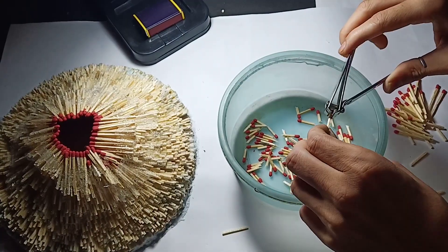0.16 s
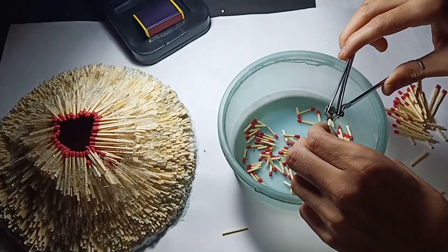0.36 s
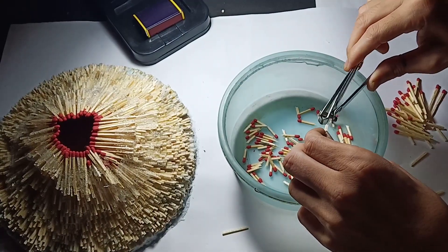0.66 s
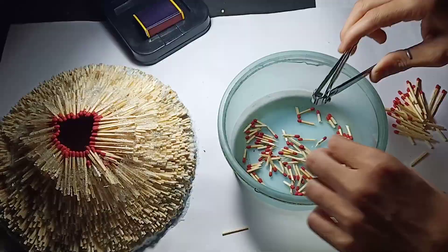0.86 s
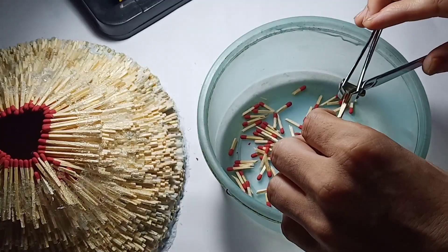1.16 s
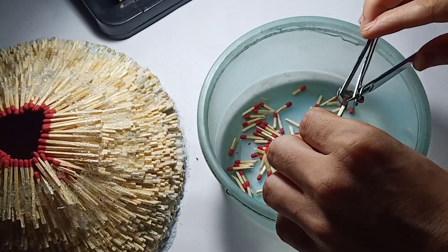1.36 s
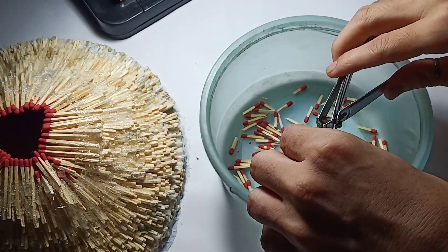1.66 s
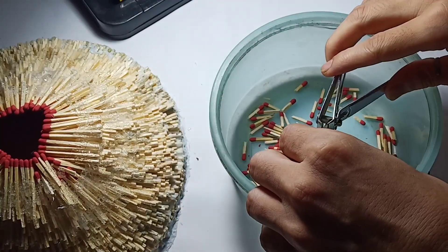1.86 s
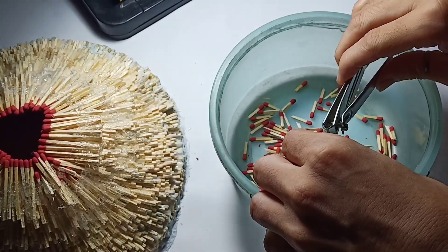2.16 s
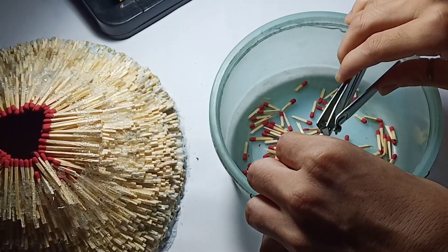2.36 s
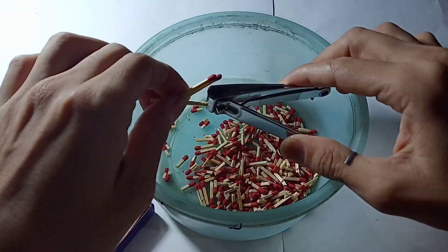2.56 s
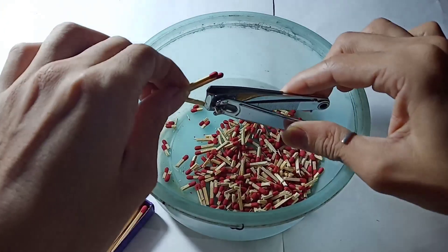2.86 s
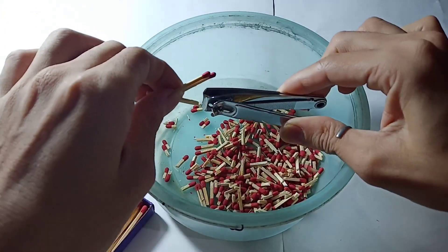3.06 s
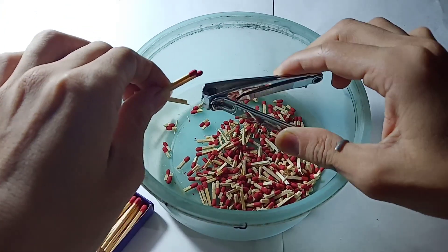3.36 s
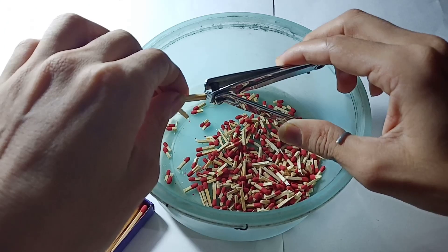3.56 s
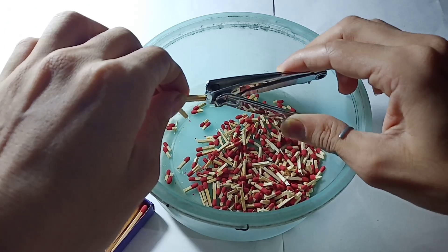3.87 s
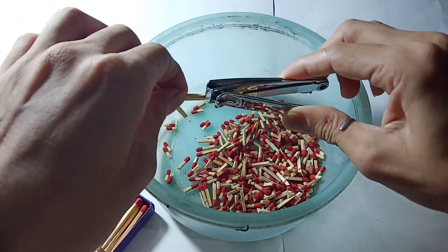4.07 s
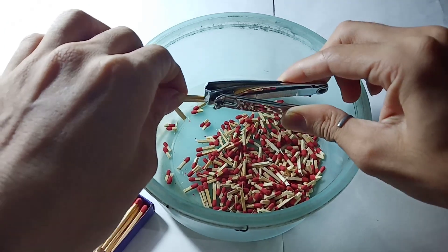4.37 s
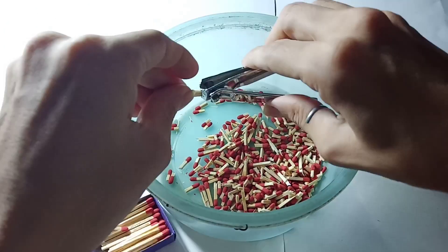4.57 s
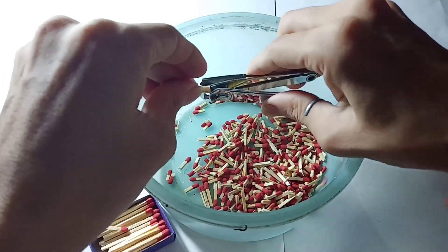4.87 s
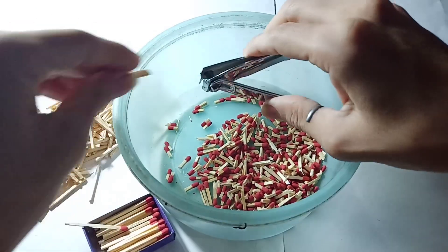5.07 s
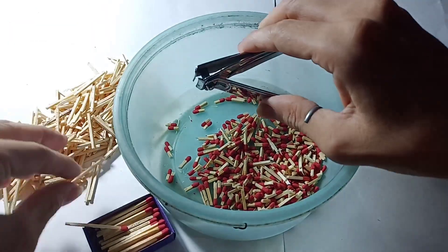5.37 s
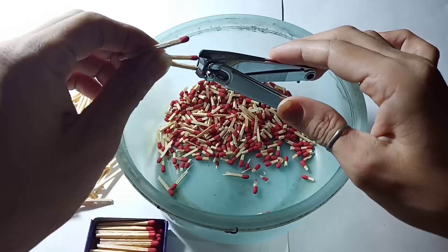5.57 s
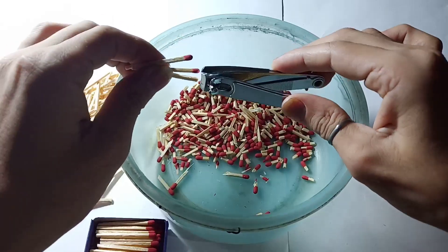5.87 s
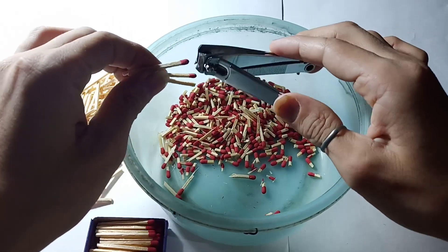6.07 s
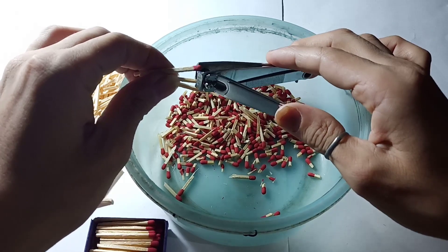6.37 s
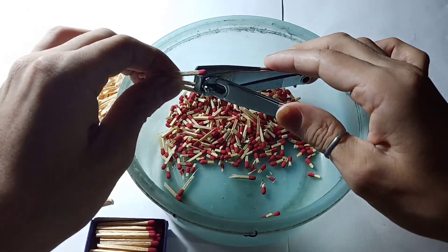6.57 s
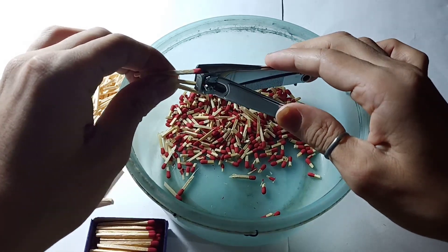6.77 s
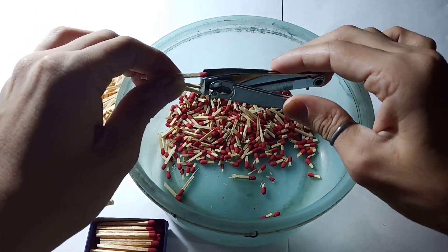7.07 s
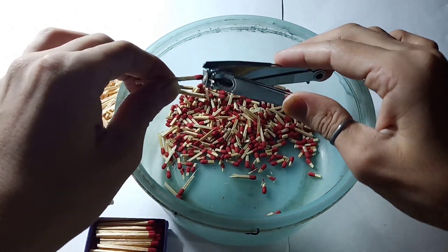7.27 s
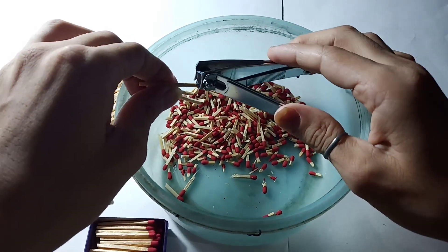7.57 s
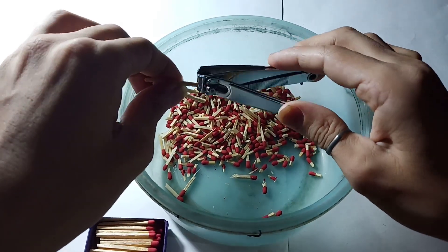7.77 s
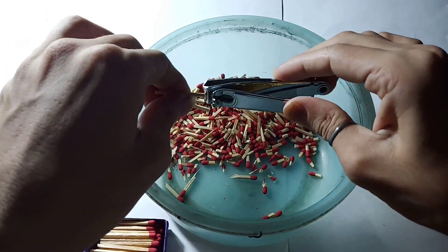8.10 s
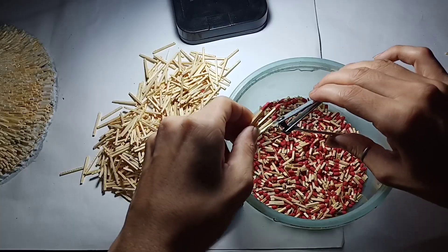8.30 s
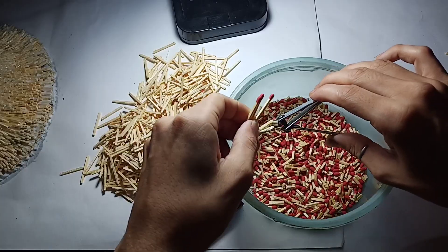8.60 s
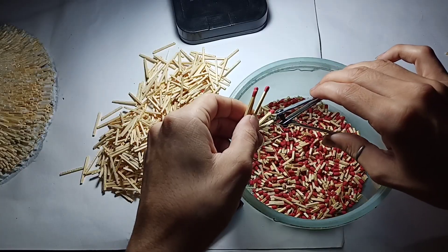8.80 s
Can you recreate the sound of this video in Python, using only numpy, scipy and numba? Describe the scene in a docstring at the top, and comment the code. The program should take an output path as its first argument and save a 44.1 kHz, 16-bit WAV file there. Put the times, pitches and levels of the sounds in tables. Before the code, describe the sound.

Indoors at a table, a steel nail clipper cuts wooden matchsticks over a plastic bowl. A low hum and airy rush come first, then crisp snaps followed by small bowl ticks. A quieter stretch has soft bumps; later ones bring more hiss and clusters of cuts. Near the end the room drops almost silent, with a faint double knock and a last click. Close mono phone microphone.

```python
"""A low hum and the rush of the room come first, then sharp clicks, with a mono phone microphone close by.
A steel nail clipper snips matchsticks over a plastic bowl, in seven stretches that fade in and out.
A click is a burst of tiny cracks that rings jaws, stick and bowl, then a bright room tail of noise.
Hum, boom, rush and hiss are wavering tone and noise; bumps through the table are decaying sines.
Thin tones, rattling heads and a double knock come between; gain control ducks all around loud sounds."""
import sys
import numpy as np
from scipy import signal
from scipy.io import wavfile
from scipy.ndimage import uniform_filter1d, minimum_filter1d
from numba import njit

SR = 44100
rng = np.random.default_rng(int(sys.argv[2]) if len(sys.argv) > 2 else 0)


def pcm_store(signal):
    """Save signal as 16-bit PCM."""
    levels = np.round(np.clip(np.atleast_2d(signal), -1, 1) * 32767)
    wavfile.write(sys.argv[1], SR, levels.astype(np.int16).T)


N = 394254


def undb(db):
    """Decibels to amplitude."""
    return 10 ** (np.asarray(db) / 20)


def unit(x):
    """Scale to rms 1."""
    return x / np.sqrt(np.mean(x ** 2))


def even(y):
    """Scale so that the loudest millisecond has peaks near 1."""
    return y / (2.09 * np.sqrt(uniform_filter1d(y ** 2, size=44).max()))


def decay(t, t60):
    """Exponential fall of 60 dB in t60 seconds."""
    return np.exp(-np.log(1000) * t / t60)


def add(out, s, x):
    """Mix x into out from time s."""
    i = int(s * SR)
    out[i:i + len(x)] += x[:N - i]


def curves(table):
    """Straight lines through the rows of a table, one curve for each column after the time."""
    t = np.arange(N) / SR
    s, *columns = np.transpose(table)
    return [np.interp(t, s, c) for c in columns]


def walk(rate):
    """Random levels held 1 / rate s and slewed twice; spread near 1."""
    k = int(SR / rate)
    steps = np.repeat(rng.standard_normal(N // k + 1), k)
    return 1.37 * uniform_filter1d(uniform_filter1d(steps, k), k)[:N]


def band(hz, width, size=N):
    """Noise in a fixed band, rms 1."""
    edges = hz - width / 2, hz + width / 2
    sos = signal.butter(2, edges, "band", fs=SR, output="sos")
    return unit(signal.sosfilt(sos, rng.standard_normal(size)))


def above(x, hz):
    """Steep high-pass."""
    return signal.sosfilt(signal.butter(4, hz, "high", fs=SR, output="sos"), x)


def coloured(points, flicker_db, share, count):
    """Neighbouring noise bands that follow a spectrum, each flickering alone."""
    hz, db = np.transpose(points)
    centres = np.geomspace(hz[0], hz[-1], count)
    # a band is as wide as a share of its centre, so its power grows with frequency
    gains = np.interp(np.log(centres), np.log(hz), db) + 10 * np.log10(centres)
    return unit(sum(undb(g + flicker_db * walk(22)) * band(f, share * f) for f, g in zip(centres, gains)))


@njit
def svf(x, hz, width):
    """State-variable band-pass whose centre and width move every sample."""
    y, b, l = np.empty(len(x)), 0., 0.
    for i in range(len(x)):
        g, k = np.tan(np.pi * hz[i] / SR), width[i] / hz[i]
        v = (b + g * (x[i] - l)) / (1 + g * (g + k))
        b, l, y[i] = 2 * v - b, l + 2 * g * v, k * v
    return y


def drifting(hz, width):
    """Noise through a moving resonance applied twice, rms near 1 at any width."""
    noise = rng.standard_normal(N) / np.sqrt(width)
    return unit(svf(svf(noise, hz, width), hz, width))


# the seven stretches: start t/s, fade-in t/s, end t/s, fade-out t/s, steady share of the hum [0-1],
# boom width f/Hz, hiss level/dB and rustle level/dB over the treble level
STRETCHES = [(-.1, .01, 0.98, 0.093, 0.62, 303, -3, -25.5), (1.007, 0.037, 2.521, 0.15, 0.036, 115, 2, -22),
             (2.494, 0.05, 3.554, 0.14, 0.84, 342, -5.5, -25.5),
             (3.493, 0.00081, 4.49, 0.096, 0.15, 220, -4, -22.5),
             (4.537, 0.0012, 5.565, 0.1, 0.15, 217, -4.5, -22.5),
             (5.603, 0.042, 8.272, 0.057, 0.4, 307, -6, -27),
             (8.305, 0.06, 9.19, 0.14, 0.08, 250, -10, -16)]
# colour of each stretch: rumble level/dB under the hum, then noise near 4.6 kHz, near 9 kHz
# and at 2-4 kHz, each level/dB over the treble level
SHADES = [(-5, -15.5, -26.5, 0.3), (-5.5, -3.5, -30, -1), (-20.5, -16.5, -23.5, .3), (-13, -26.5, -22.5, 0),
          (-4.5, -19, -17.5, -0.1), (-8, -24, -31.5, 0.1), (-8, -17, -22, -.3)]


def by_stretch():
    """Number of the stretch that each sample belongs to."""
    return np.searchsorted(np.transpose(STRETCHES)[0], np.arange(N) / SR) - 1


# pitch of the hum: t/s, f/Hz
HUM = [(0, 132.1), (.19, 116), (.32, 120), (.9, 119.7), (1.05, 89.04), (1.25, 104), (1.49, 82.1),
       (1.8, 105), (1.92, 83.8), (2.1, 81.84), (2.38, 114.9), (2.55, 104), (3.45, 104), (3.57, 122.2),
       (4.03, 106), (4.38, 122), (5.07, 122), (5.2, 98.07), (5.45, 105.2), (5.67, 130), (5.76, 130.3),
       (5.9, 92), (6.36, 89.77), (6.45, 97.8), (6.9, 83.6), (7.28, 78.63), (7.39, 130.7), (8.0, 119.9),
       (8.1, 102.6), (8.35, 122), (8.9, 125)]
# the low end, in groups of rows: t/s, hum level/dB, boom level/dB, boom f/Hz
LOWS = [
    [(0.0, -28.5, -35, 248), (0.14, -34.5, -42, 271), (0.22, -41, -42.5, 387), (0.3, -27.5, -40, 225.8),
     (0.324, -33.5, -40, 261.5), (0.506, -36, -57, 219.6), (0.534, -31, -61, 228), (0.57, -37.5, -42, 291),
     (0.664, -36.5, -56.5, 220.7), (0.756, -32, -58, 220.4), (0.86, -36.5, -45.5, 224)],
    [(1.05, -54, -61, 219.2), (1.078, -47.5, -72.5, 218), (1.164, -35, -48, 225.3),
     (1.198, -55.5, -51, 244), (1.226, -35, -52, 221.7), (1.386, -69, -60, 245), (1.42, -52, -45, 252),
     (1.528, -45, -56, 249.6), (1.59, -63, -53, 229.8), (1.634, -45, -50.5, 256), (1.7, -64, -52, 228.3)],
    [(1.72, -42, -52, 237.5), (1.748, -57, -52, 242), (1.778, -33.5, -55, 225), (1.832, -49, -55, 248.7),
     (1.91, -46, -55, 247.5), (1.944, -59, -58, 245), (2.01, -50, -54, 362.5), (2.04, -60, -53, 318),
     (2.092, -33.5, -43, 336), (2.178, -57, -49.5, 336), (2.38, -59, -54, 371)],
    [(2.55, -62, -38.5, 436), (2.764, -32, -42.5, 357.4), (2.818, -31, -38, 401), (2.914, -36.5, -56, 321),
     (3.028, -33, -42, 332), (3.08, -31, -51, 251), (3.13, -38, -41, 310), (3.178, -33.5, -41.5, 275.4),
     (3.212, -42, -53, 416), (3.272, -38.5, -36, 408), (3.39, -40.5, -41.5, 382)],
    [(3.5, -57.5, -42, 420), (3.53, -54, -50, 447), (3.65, -57, -42.5, 389), (3.678, -70, -41, 423),
     (3.772, -58, -55, 437), (3.794, -64, -49, 407), (4.154, -55, -39.5, 419), (4.186, -58, -49.5, 385),
     (4.252, -86, -44, 432), (4.272, -65, -48, 451.5), (4.38, -61, -49.5, 400)],
    [(4.55, -58, -40.5, 453), (4.606, -76, -57, 419), (4.646, -65, -45.5, 422), (4.764, -75, -41, 334),
     (4.82, -74, -50, 393), (4.996, -64, -54.5, 460), (5.136, -69, -56, 445), (5.158, -64, -61, 383.5),
     (5.196, -69, -43, 400), (5.442, -73.5, -38.5, 427), (5.45, -79, -46, 432)],
    [(5.67, -56.5, -51, 390), (5.696, -41.5, -38.5, 376), (5.746, -35.5, -51, 251),
     (5.806, -38, -47, 273.5), (5.838, -58, -52, 385), (5.888, -40.5, -40, 449), (5.982, -39.5, -55, 269),
     (6.056, -35, -51.5, 346.5), (6.352, -48.5, -45.5, 380), (6.426, -39.5, -62, 245), (6.5, -58, -48, 325)],
    [(6.53, -37, -45, 410), (6.56, -52, -40.5, 463), (6.814, -46.5, -50.5, 352), (6.846, -41, -63, 239),
     (6.906, -52, -50.5, 361), (7.052, -42, -40.5, 386.5), (7.084, -49, -56, 322), (7.16, -37, -43, 385),
     (7.212, -47, -65, 342), (7.246, -39, -37.5, 448), (7.3, -52, -46, 403.5)],
    [(7.33, -60, -41, 382), (7.4, -58, -46, 398), (7.45, -37, -41.5, 261), (7.49, -69, -51, 365),
     (7.538, -40, -40, 357), (7.584, -60, -44.5, 392.5), (7.834, -44, -39.5, 252), (7.864, -56, -54, 280),
     (7.942, -49, -36, 412.6), (8.006, -45, -44, 253), (8.1, -41, -38.5, 410)],
    [(8.35, -51.5, -67.5, 224), (8.382, -52.5, -72, 217), (8.434, -81, -74, 275), (8.48, -53.5, -77, 219.4),
     (8.552, -70, -64, 273), (8.626, -80, -75, 296.5), (8.722, -63.5, -72, 295), (8.786, -83.5, -58, 427.8),
     (8.832, -63, -65, 319), (8.858, -86, -80, 295), (8.9, -70, -74, 298)],
]


def low_end():
    """The hum is part steady tone, part lumpy rumble at its pitch; the boom is a drifting noise resonance."""
    hum_db, boom_db, boom_hz = curves(np.vstack(LOWS))
    hum_hz, = curves(HUM)
    stretch = by_stretch()
    steady, width = np.array(STRETCHES)[stretch, 4:6].T.copy()
    rumble_db = np.array(SHADES)[stretch, 0]
    phase = 2 * np.pi * np.cumsum(hum_hz * (1 + 0.0203 * walk(18))) / SR
    tone = np.sqrt(2) * np.sin(phase) * undb(1.4 * walk(23))
    lumps = undb(2.8 * walk(25)) * drifting(hum_hz, np.full(N, 45.))
    rumble = lumps + undb(rumble_db) * band(60, 45) + undb(-8.5) * band(170, 60)
    hum = np.sqrt(steady) * tone + np.sqrt(1 - steady) * rumble
    boom = undb(boom_db + 2.2 * walk(20)) * drifting(boom_hz, width)
    return undb(hum_db) * hum + boom


# the room noise swells and sinks: t/s, rush level/dB, treble level/dB, level/dB near 520 Hz before a trim
SWELL = [(0.0, -44.5, -44.5, -45), (0.08, -44, -45.0, -50), (0.15, -43, -45.5, -46.5),
         (0.23, -39.5, -43.5, -41), (0.31, -43.5, -47.5, -46), (0.39, -43.5, -48, -45.5),
         (0.46, -46, -49.5, -49), (0.54, -43.5, -49.5, -47), (0.62, -44.5, -48, -51),
         (0.7, -50.5, -52, -59), (0.77, -45, -48.5, -51.5), (0.85, -53, -56.5, -60),
         (1.06, -64.5, -64.5, -80), (1.14, -63, -64.5, -74), (1.21, -57, -62, -76), (1.28, -56.5, -68, -73),
         (1.36, -59.5, -70, -74), (1.43, -56, -62.5, -74), (1.5, -51.5, -61.5, -71), (1.58, -49, -63, -70),
         (1.65, -49.5, -60, -70), (1.72, -50.0, -57.5, -60), (1.8, -50.5, -57, -72),
         (1.87, -51, -57.5, -76), (1.94, -52, -59.5, -72), (2.01, -53.5, -60, -61.0),
         (2.09, -45.5, -54.5, -52.5), (2.16, -52, -56, -54.5), (2.23, -58.5, -59, -57),
         (2.31, -56, -58, -62), (2.38, -47, -48.5, -59), (2.56, -39.0, -45, -47.5),
         (2.63, -41.5, -46.0, -50), (2.71, -42, -46, -43.0), (2.79, -37.5, -43, -43.0),
         (2.86, -44, -44.5, -47), (2.94, -42.5, -47.5, -48), (3.02, -36, -43.5, -46.0),
         (3.09, -43, -45, -50), (3.17, -42.5, -49.5, -49.5), (3.25, -39, -43.5, -47), (3.32, -39, -45, -44),
         (3.4, -47, -49, -50), (3.51, -40.5, -48.5, -51), (3.58, -41.5, -49.5, -49.0),
         (3.66, -42, -45.5, -53), (3.73, -43.0, -48.5, -44), (3.8, -43, -49, -50),
         (3.87, -42.5, -45.5, -47.5), (3.95, -36, -44.5, -49.5), (4.02, -39, -44.5, -39),
         (4.09, -38.5, -47.0, -41.5), (4.17, -43, -49.5, -48), (4.24, -41, -47.5, -47),
         (4.31, -43.0, -48.5, -44), (4.38, -44.5, -49.5, -56), (4.55, -43.5, -48.5, -53),
         (4.63, -43, -48.5, -56), (4.7, -40.5, -48, -50.5), (4.78, -40, -44.5, -51.5),
         (4.85, -46, -46.5, -54.5), (4.92, -47.5, -49.5, -54), (5.0, -44.5, -47.5, -52.5),
         (5.07, -44, -48.5, -51.0), (5.15, -41.5, -48.5, -52), (5.22, -40.5, -47.5, -49),
         (5.29, -41, -46.5, -43), (5.37, -41, -45.5, -49), (5.44, -41, -48.5, -42),
         (5.67, -48.5, -50.5, -57), (5.74, -45, -46.5, -52), (5.81, -45, -50, -48.5),
         (5.89, -39.5, -46.5, -46.5), (5.96, -42.5, -46, -45), (6.04, -44.5, -47.5, -45),
         (6.11, -42.5, -47, -44), (6.19, -43.5, -46.5, -52), (6.26, -40, -45, -43), (6.33, -44.5, -47, -54),
         (6.41, -43.5, -46.5, -50.5), (6.48, -40.5, -46.5, -54), (6.56, -41.0, -45.5, -51),
         (6.63, -38.5, -44.5, -44.5), (6.71, -44.5, -46.5, -53), (6.78, -47, -47.0, -51),
         (6.86, -47, -46.5, -60), (6.93, -40, -48, -47), (7.0, -41, -47, -50), (7.08, -44.5, -48, -52),
         (7.15, -43.5, -45, -50), (7.23, -48.5, -48.5, -55), (7.3, -41, -45.5, -44),
         (7.38, -42.5, -45.5, -51), (7.45, -44, -44.5, -49.0), (7.53, -41.5, -47.5, -47),
         (7.6, -45.5, -49.0, -53), (7.67, -42.0, -49.0, -48), (7.75, -42.5, -47.5, -46.0),
         (7.82, -44, -47.5, -54), (7.9, -47, -50, -51), (7.97, -41, -48.5, -43),
         (8.05, -40.5, -46.5, -47.5), (8.12, -41.5, -46.5, -46), (8.2, -54.5, -54, -64),
         (8.37, -73, -81.5, -75), (8.52, -73.5, -82, -79.5), (8.67, -75.5, -84, -78), (8.9, -77, -86, -85)]
# spectrum of the rush: f/Hz, relative level/dB per Hz
RUSH = [(600, -7.5), (700, -3.5), (1000, -7), (1400, -6.5), (2000, -12.5)]
# spectrum of the noise at 2-5 kHz: f/Hz, relative level/dB per Hz
SIZZLE = [(2100, 0.5), (3000, -1), (4100, -4), (5000, -12)]
# spectrum of the hiss: f/Hz, relative level/dB per Hz
HISS = [(5300, -10), (6000, -0.5), (6600, -0.5), (7300, -6), (8300, -14), (9500, -24)]
# spectrum of the faint bright rustle: f/Hz, relative level/dB per Hz
RUSTLE = [(9500, 0), (12000, -5.5), (14500, -1)]
SHIMMER_HISS_DB = -4  # hiss share of the afterglow of the clicks
RUSTLE_SWING = 1  # extra dB of rustle for each dB of swell


def room_noise():
    """Rush, hiss and rustle are flickering noise bands; the treble layers share one level."""
    rush_db, treble_db, low_db = curves(np.vstack(SWELL))
    stretch = by_stretch()
    hiss_db, rustle_db = np.array(STRETCHES)[stretch, 6:].T
    gap_db, air_db, sizzle_db = np.array(SHADES)[stretch, 1:].T
    mean_db = np.bincount(stretch, treble_db) / np.bincount(stretch)
    swell_db = treble_db - mean_db[stretch]
    glow = shimmer()
    rush = undb(rush_db) * coloured(RUSH, flicker_db=2.5, share=0.089, count=18)
    low = undb(low_db - 0.5 + 0.89 * walk(25)) * band(520, 170)
    sizzle = undb(treble_db + sizzle_db) * coloured(SIZZLE, flicker_db=2.0, share=.12, count=8)
    gap = undb(treble_db + gap_db + 2.2 * walk(23)) * band(4600, 1400)
    air = undb(treble_db + air_db) * band(9200, 2200)
    hiss_level = np.hypot(undb(treble_db + hiss_db), undb(SHIMMER_HISS_DB) * glow)
    hiss = hiss_level * coloured(HISS, flicker_db=1.0, share=0.11, count=8)
    rustle_level = np.hypot(undb(treble_db + rustle_db + RUSTLE_SWING * swell_db), glow)
    rustle = rustle_level * undb(2.1 * walk(120)) * coloured(RUSTLE, flicker_db=4.5, share=0.11, count=7)
    return rush + low + sizzle + gap + air + hiss + rustle


def background():
    """Low end and room noise swell and sink together in a quick shared flutter."""
    return undb(1.1 * walk(25)) * (low_end() + room_noise())


def microphone_hiss():
    """Even hiss of the microphone: broad noise at a constant level."""
    return undb(-78) * band(9000, 13000)


def ring(modes, crack, detune):
    """A crack excites decaying modes with fresh strengths, pitches and signs."""
    t = np.arange(int(.12 * SR)) / SR
    body = np.zeros(len(t))
    for hz, db, t60 in modes:
        strength, pitch, sign = rng.standard_normal(3)
        wave = np.sin(2 * np.pi * hz * (1 + detune * pitch) * t)
        body += undb(db + 2.0 * strength) * np.sign(sign) * wave * decay(t, t60)
    return even(signal.fftconvolve(body, crack))


# clicks, before gain control: t/s, jaws peak level/dB, bowl minus jaws level/dB, stick minus jaws level/dB,
# bowl pitch f/Hz, crack length t/ms, room tail level/dB relative to the jaws
CLICKS = [(0.6386, -22.5, -11, -20, 2040, 1.6, -14), (0.6567, -1.5, -21, -14, 3360, 2.4, -21),
          (0.692, -30, 3, 6, 3600, 2.2, -24), (0.6948, -12.5, -2, 2, 3980, 2, -23),
          (0.7125, -40, 13, 0, 4050, 2.5, -20), (0.731, -21, 1.5, 10, 2540, 2.6, -23),
          (0.762, -14, -20, -6, 3950, 1.7, -31), (0.827, -27, -6.5, 0.5, 3800, 3, -23),
          (0.8589, -45.5, -5, 3.5, 3700, 1.9, -33), (1.227, -52, -12, 4, 4500, 1.5, -28),
          (1.778, -39.5, -6, 1, 3950, 2.2, -22), (2.0532, -46, -14, -2, 2040, 1.8, -32),
          (2.073, -27, -15, -10, 2060, 1.6, -22), (2.092, -33, -9, -8, 3860, 2, -24),
          (2.102, -6, -19, -11, 3680, 2.1, -27), (2.132, -22.5, -16, -2, 4890, 2.6, -46),
          (2.168, -23.5, -27, -8, 3820, 1.5, -27), (2.276, -26, 0, 3, 3800, 1.4, -28),
          (2.2837, -23, -9, 3, 3760, 1.7, -22), (2.289, -34.5, 5, 6, 3800, 1.8, -25),
          (2.371, -34.5, 5.5, 6, 3000, 2, -37), (2.408, -35.5, 8, 10, 3800, 1.8, -30),
          (2.898, -33, -9, -0.5, 2140, 1.8, -13), (2.9637, -46.5, 17.5, 15, 3080, 2.1, -18),
          (3.059, 6, -16.5, -17, 4370, 2.8, -28), (3.0855, -17.5, 8.5, 6, 4200, 1.9, -25),
          (3.1482, -14.5, -9.5, -3, 2600, 1.2, -31), (3.158, -34, -10, 2, 3500, 1.5, -30),
          (3.166, -41, 2, 3, 3500, 1.8, -33), (3.3364, -38, 13, 2, 3800, 1.2, -15.5),
          (3.5498, -27, -1, -2, 3500, 3, -18), (3.814, -26.5, -9, -5, 2620, 1.6, -21),
          (3.961, -27, -6, -6, 2400, 1.9, -17), (4, -28, -13, -32, 2410, 1.8, -16),
          (4.1779, -45, -2, -3, 2690, 1.8, -30), (4.659, -27, -8, -6, 2710, 1.9, -27),
          (4.6734, -29, -14, -12.5, 3200, 1.8, -18.5), (4.7042, -34, -15, -11, 2310, 1.6, -16),
          (4.7855, 10.5, -20, -10.5, 4420, 1.3, -28), (4.8044, -26.5, -11, -5, 3820, 1.8, -28.5),
          (4.816, -7, -14, -3, 4000, 1.1, -30), (4.819, -10, -13, 2, 3800, 0.84, -37),
          (4.8392, -23, 6, -3, 4200, 1.4, -28), (4.852, -28, -9, -1, 3570, 1.8, -28),
          (4.868, -29.5, 4.5, 6.5, 4310, 2, -26), (4.928, -30, -17, 8.5, 2600, 2, -30),
          (4.9424, -33, 7, 1, 3980, 1.3, -32), (4.9506, -27, 0, 3, 3830, 1.6, -25),
          (4.9726, -33, -11, 3, 2030, 1.5, -17), (5.1327, -28, -24, -15, 2060, 2.7, -24),
          (5.153, -22, -11, -9, 2070, 3.8, -22), (5.3837, -42.5, 4, 11.5, 2180, 1.4, -14),
          (5.662, -42, -20, 0, 3770, 1.7, -27), (5.8233, 1.5, -20, -9.5, 3420, 2.4, -27),
          (5.835, -26, 2, -3, 3500, 2.4, -24.5), (5.891, -37.5, 8, 8.5, 2680, 2.3, -19),
          (5.9179, -32, 0, 5, 2160, 1.6, -28), (6.111, -29, -2.5, -1, 5000, 3.2, -22),
          (6.1537, -12, -13, -23, 5100, 1.9, -27), (7.036, -27.5, -16, -17, 2270, 1.6, -18),
          (7.044, -35, -5, -12.5, 2400, 2, -26), (7.0628, -29, -14, -7, 2320, 2, -18),
          (7.186, -9.5, -27, -13, 2440, 1.6, -20), (7.1945, -25, -17, -12, 2340, 1.8, -29),
          (7.2467, -18.5, 2, -4, 3880, 2, -27), (7.4102, -47, 16, 7, 3440, 1.9, -28),
          (7.4695, -30.5, -16, -1, 2730, 2.2, -21), (7.5033, -31, -4, -14, 2370, 2, -32),
          (7.5268, -18.5, -16.5, -18, 5000, 2.3, -31), (7.9084, -39, -8, -6, 2020, 1.6, -20),
          (8.127, 0.5, -34, -13.5, 3570, 0.91, -23.5), (8.1477, -15.5, 1, 1.5, 3900, 2, -23.5),
          (8.1565, -32, -4, 3, 2700, 1.5, -35), (8.169, -40, 4, 3, 2800, 1.6, -31),
          (8.212, -50, 2, 12, 4970, 1.2, -34), (8.216, -41.5, 11, 10, 2810, 1.4, -9),
          (8.9244, -21, -25, -7.5, 3600, 1.7, -17.5)]
# ringing modes of the steel jaws: f/Hz, relative level/dB, 60 dB decay t/s
JAWS = [(9800, -1, 0.0026), (11430, -3, 0.0022), (12500, -3.5, 0.0041), (14360, -5, 0.0061),
        (16160, 0, 0.0025)]
# ringing modes of the matchstick: f/Hz, relative level/dB, 60 dB decay t/s
STICK = [(5700, -5, 0.0033), (6580, 3.5, 0.0058), (7980, -2, 0.0058)]
# ringing modes of the plastic bowl: f/Hz, relative level/dB, 60 dB decay t/s
BOWL = [(1590, -8.5, 0.012), (2320, -2, 0.01), (2980, -10, 0.0019), (3786, -4, 0.0096), (4115, -2.5, 0.011),
        (5100, -5, 0.0027)]
BELOW_DB_OCT, ABOVE_DB_OCT = 12, 6.5  # how fast bowl modes weaken below and above the struck pitch
SPOT_DB, SPOT_T60_S = 0, 0.012  # ring of the struck spot of the bowl
EDGE, BOWL_EDGE = 0.78, 0.58  # high-pass of jaws and stick, and of the bowl, as shares of the bowl pitch
THUD_DB, SNAP_DB = -4.5, -5  # broad body of the crack over the bowl; bare crack over the jaws
TAIL_DELAY_S, TAIL_T60_S, ECHO_S, ECHO_DB = 0.0026, 0.12, .009, -24


def clicks():
    """Wood fibres part in a burst of tiny cracks; the room answers with a tail of the same colour."""
    out, t = np.zeros(N), np.arange(int(.25 * SR)) / SR
    jaws_air = unit(band(13500, 4500) + undb(-10.0) * band(9500, 3300))
    airs = np.array([jaws_air, band(6600, 2700), band(3800, 2200)])  # jaws, stick, bowl
    tail = np.clip(t / TAIL_DELAY_S, 0, 1) ** 2 * decay(t, TAIL_T60_S)
    for s, db, bowl_db, stick_db, bowl_hz, ms, tail_db in CLICKS:
        # spiky cracks that set in fast, then stop short
        age = t[:400] * 1000 / ms
        spikes = rng.standard_normal(400) * undb(4.3 * rng.standard_normal(400))
        crack = spikes * (1 - np.exp(-12 * age)) * np.exp(-1.3 * age ** 1.2)
        hit = ring(JAWS, crack, 0.016) + undb(stick_db) * ring(STICK, crack, 0.029)
        add(out, s, undb(db) * above(hit, EDGE * bowl_hz))
        # the spot where the bowl is struck favours the modes near its pitch
        struck = [(bowl_hz, SPOT_DB, SPOT_T60_S)]
        for hz, mode_db, t60 in BOWL:
            slope = BELOW_DB_OCT if hz < bowl_hz else ABOVE_DB_OCT
            struck.append((hz, mode_db - slope * abs(np.log2(hz / bowl_hz)), t60))
        bowl = above(ring(struck, crack, 0.018), BOWL_EDGE * bowl_hz)
        add(out, s, undb(db + bowl_db) * bowl)
        sos = signal.butter(3, [.62 * bowl_hz, 9000], "band", fs=SR, output="sos")
        thud = even(signal.sosfilt(sos, crack))
        add(out, s, undb(db + bowl_db + THUD_DB) * thud)
        snap = even(np.diff(np.diff(crack)))  # differencing twice keeps the treble
        add(out, s, undb(db + SNAP_DB) * snap)
        # first bounce off a nearby wall
        add(out, s + ECHO_S, undb(db + ECHO_DB) * ring(JAWS, crack, 0.053))
        start = min(int(s * SR), N - len(t))
        air = undb([0, stick_db + 2.5, bowl_db + 0.5]) @ airs[:, start:start + len(t)]
        add(out, s, undb(db + tail_db) * tail * air)
    return out


SHIMMER_DB, SHIMMER_T60_S = -51, .35  # bright afterglow of a click, relative to its jaws


def shimmer():
    """Every click leaves the treble of the room lit for a moment: energies add and decay; gives amplitude."""
    kicks = np.zeros(N)
    s, db = np.transpose(CLICKS)[:2]
    kicks[(s * SR).astype(int)] = undb(2 * (db + SHIMMER_DB))
    keep = decay(2 / SR, SHIMMER_T60_S)  # energy kept each sample
    return np.sqrt(signal.lfilter([1], [1, -keep], kicks))


# bumps through the table: t/s, peak level/dB, f/Hz, 60 dB decay t/s, swell [cycles]
BUMPS = [(1.043, -33.5, 79, 0.071, 1.1), (1.139, -31.5, 99, 0.07, 1.1), (1.215, -27, 109, 0.093, 1.1),
         (1.254, -31, 106, 0.063, 0.74), (1.33, -39.5, 110, 0.056, .8), (1.419, -36, 77.5, 0.097, .8),
         (1.505, -38, 99, 0.11, .8), (1.625, -41, 84.4, 0.11, .8), (2.074, -46, 80, 0.077, .8),
         (1.77, -30, 104, 0.028, 0.61), (8.127, -7, 88, 0.017, 0.15), (8.336, -46, 102, 0.081, .8),
         (8.465, -55, 122, 0.16, 1.1)]


def bumps():
    """A bump through the table is a low sine that swells, then dies away."""
    out, t = np.zeros(N), np.arange(SR // 2) / SR
    for s, db, hz, t60, swell in BUMPS:
        push = (1 - np.exp(-t * hz / swell)) * decay(t, t60)
        add(out, s, -undb(db) * np.sin(2 * np.pi * hz * t) * push / push.max())
    return out


# thin tones: start t/s, end t/s, f/Hz, level/dB, waver f/Hz
TONES = [(5.656, 5.682, 10600, -57, 98), (3.545, 3.568, 3520, -45.5, 83), (3.546, 3.563, 5320, -41, 88),
         (6.89, 7.008, 8430, -52, 110), (8.312, 8.365, 1210, -62.5, 30), (8.37, 8.413, 1220, -64, 18),
         (8.41, 8.58, 1225, -76, 29), (8.505, 8.555, 1223, -63, 20), (8.59, 8.69, 1224, -67, 17),
         (8.85, 8.92, 1215, -73, 30), (1.4, 1.568, 221, -42, 35), (1.791, 1.928, 235, -45, 36),
         (8.316, 8.383, 783, -58, 17), (8.312, 8.388, 960, -61, 20), (8.35, 8.394, 2005, -69.5, 27),
         (8.554, 8.61, 747, -62.5, 22)]


def thin_tones():
    """Short sines with soft ends, wavering in pitch and level."""
    out = np.zeros(N)
    for start, end, hz, db, waver_hz in TONES:
        shape = signal.windows.tukey(int((end - start) * SR), .6)
        size = len(shape)
        phase = 2 * np.pi * np.cumsum(hz + waver_hz * walk(46.4)[:size]) / SR
        tone = np.sqrt(2) * np.sin(phase) * undb(1.7 * walk(52)[:size])
        add(out, start, undb(db) * shape * tone)
    return out


# heads slide and rattle in the bowl: t/s, level/dB, 60 dB decay t/s, brightness level/dB, jingle level/dB
RATTLES = [(2.257, -41.5, 0.3, 5, -30), (5.678, -30.5, 0.46, -12, -21), (8.753, -64.5, 0.19, -19.5, -40)]
# broad noise of the heap: centre f/Hz, width f/Hz, relative level/dB
HEAP = [(3260, 3900, -4.5), (6580, 1550, -0.5)]
# narrow noise bands of the jingle: f/Hz
JINGLE_HZ = [10000, 10600, 12600, 13000, 13600, 14700]


def rattles():
    """Match heads rattle in the bowl: broad and narrow noise bands, grainy in level, dying away."""
    out, t = np.zeros(N), np.arange(SR // 2) / SR
    for s, db, t60, bright_db, jingle_db in RATTLES:
        heap = sum(undb(g) * band(hz, width, size=len(t)) for hz, width, g in HEAP)
        bright = undb(bright_db) * band(11500, 8300, size=len(t))
        jingle = undb(jingle_db) * sum(band(hz, 60, size=len(t)) for hz in JINGLE_HZ)
        grain = undb(1.7 * walk(300)[:len(t)])
        envelope = np.clip(t / 0.0018, 0, 1) * decay(t, t60)
        add(out, s, undb(db) * (heap + bright + jingle) * grain * envelope)
    return out


# double knock, two lists: strokes (t/s, level/dB); modes (f/Hz, relative level/dB, 60 dB decay t/s)
KNOCK = ([(8.746, -41.5), (8.772, -41)], [(570, -8, 0.098), (1220, 4.5, 0.075), (1110, 6, 0.039),
         (480, -5, 0.062), (1870, -12, .04), (2130, -9.5, 0.045), (2800, -8, 0.037), (6100, -17, 0.033),
         (6800, -20, .03)])


def double_knock():
    """Two short noise bursts ring the same set of modes."""
    out, t = np.zeros(N), np.arange(1500) / SR
    strokes, modes = KNOCK
    for s, db in strokes:
        burst = rng.standard_normal(len(t)) * np.exp(-t / 0.012)
        add(out, s, undb(db) * ring(modes, burst, 0.012))
    return out


def scene():
    """One microphone feeds both channels."""
    room = background() + microphone_hiss()
    events = clicks() + bumps() + thin_tones() + rattles() + double_knock()
    return np.tile(room + events, (2, 1))


@njit
def follow(x, release):
    """Peak follower: jumps up at once, sinks slowly."""
    y, e = np.empty(len(x)), 1e-9
    for i in range(len(x)):
        e = max(x[i], e * release)
        y[i] = e
    return y


LOW_CUT_HZ, TOP_HZ = 42, 15600
KNEE_DB, RATIO, AHEAD_S, RELEASE_S = -14.5, 1.76, 0.0099, 0.026  # gain control


def record(dry):
    """Bass cut, look-ahead gain control, fades around each stretch, steep top cut."""
    dry = signal.sosfilt(signal.butter(2, LOW_CUT_HZ, "high", fs=SR, output="sos"), dry)
    ahead, t = int(AHEAD_S * SR), np.arange(N) / SR
    peak = follow(np.abs(dry.mean(axis=0)), np.exp(-1 / (RELEASE_S * SR)))
    gain = np.minimum(1, undb(KNEE_DB) / peak) ** (1 - 1 / RATIO)
    # the lowest gain nearby, smoothed, so the level dips before a loud click arrives
    gain = uniform_filter1d(minimum_filter1d(gain, 2 * ahead), ahead)
    fades = np.zeros(N)
    for start, up, end, down, *_ in STRETCHES:
        fades += np.clip((t - start) / up, 0, 1) * np.clip((end - t) / down, 0, 1) ** 5.7
    top_cut = signal.ellip(8, .2, 60, TOP_HZ, fs=SR, output="sos")
    return signal.sosfilt(top_cut, dry * gain * fades)


dry = scene()
out = record(dry)
pcm_store(out)
```